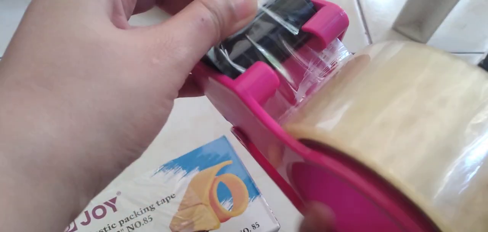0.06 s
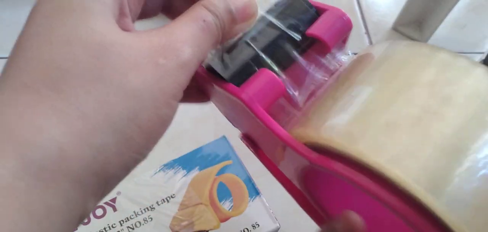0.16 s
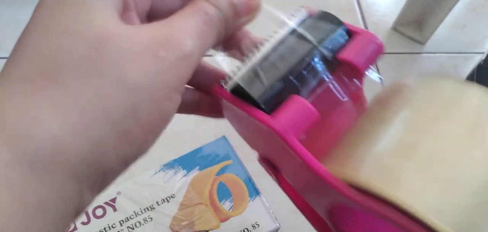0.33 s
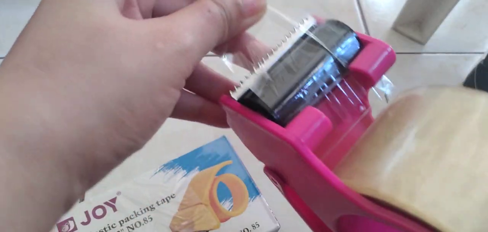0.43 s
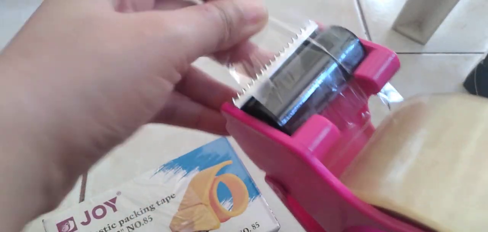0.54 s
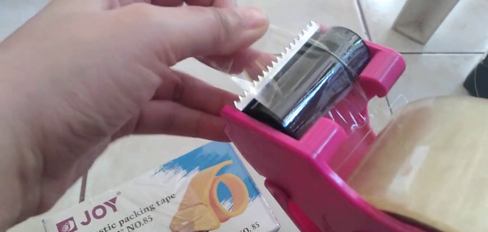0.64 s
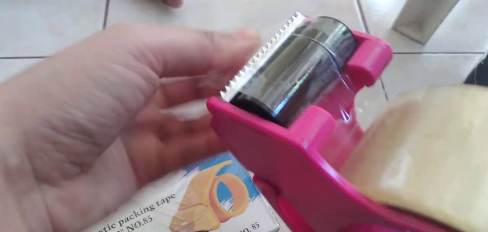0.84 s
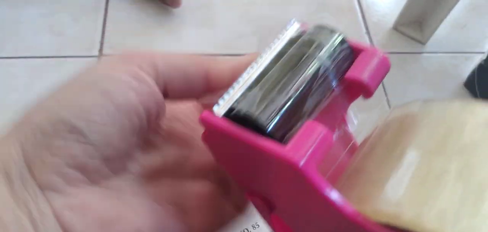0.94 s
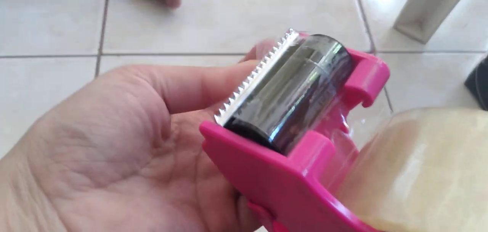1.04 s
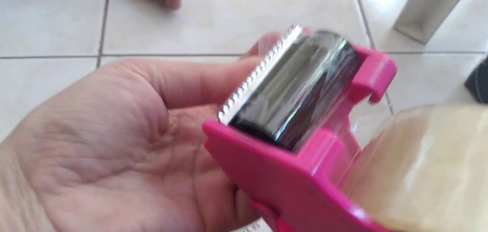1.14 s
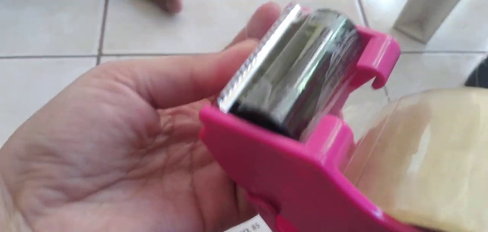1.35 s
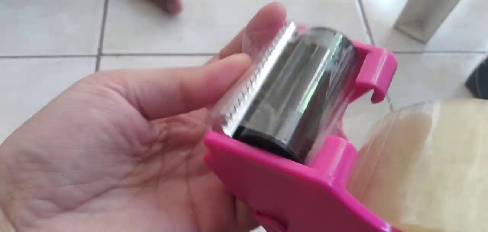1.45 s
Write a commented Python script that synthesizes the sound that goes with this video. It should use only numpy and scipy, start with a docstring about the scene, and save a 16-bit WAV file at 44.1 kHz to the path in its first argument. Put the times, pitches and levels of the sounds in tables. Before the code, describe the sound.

Packing tape ticks and snaps twice on a plastic dispenser, then crackles softly.

```python
"""Packing tape in a tiled room

A plastic dispenser is handled close to two microphones. The taut tape ticks, then snaps twice at the
blade, hard enough to overload them. Afterwards the sticky film peels and crackles under the fingers in
short strokes, now and then with a thin stick-slip squeak. A low hum lies underneath."""
import sys
import numpy as np
from scipy import signal
from scipy.fft import rfft, irfft, next_fast_len
from scipy.io import wavfile
from scipy.ndimage import uniform_filter1d

SR = 44100
rng = np.random.default_rng(int(sys.argv[2]) if len(sys.argv) > 2 else 0)


def wav_out(sig):
    """Save sig, one row per channel (or a flat mono array), as 16-bit PCM at SR to the path in sys.argv[1]."""
    wavfile.write(sys.argv[1], SR, np.round(np.clip(np.atleast_2d(sig).T, -1, 1) * 32767).astype(np.int16))


N = 66150


def amp(db):
    """Amplitude ratio of a level in decibels."""
    return 10 ** (np.asarray(db) / 20)


def unit(x):
    """Normalisation to an rms of 1."""
    return x / np.sqrt(np.mean(x ** 2) + 1e-20)


def along(points, hz):
    """Interpolation of (frequency [Hz], value) points on a logarithmic frequency axis."""
    frequencies, values = np.transpose(points)
    return np.interp(np.log(hz + 1), np.log(frequencies + 1), values)


def since(onset):
    """Time elapsed since an onset in seconds, zero before it."""
    return np.maximum(np.arange(N) / SR - onset, 0)


def pan(db):
    """Left and right gains for a level difference, right over left."""
    return amp(np.array([[-db], [db]]) / 2)


def coloured(x, points, tilt=0):
    """Minimum-phase filter through (frequency [Hz], gain [dB]) points, tilted in dB/octave about 8 kHz."""
    size = 2 * next_fast_len(N)
    hz = np.fft.rfftfreq(size, 1 / SR)
    octaves = np.log2(np.maximum(hz, 500) / 8000)
    cepstrum = irfft(np.log(amp(along(points, hz) + tilt * octaves)), size)
    cepstrum[1:size // 2] *= 2  # folding the cepstrum makes the filter causal
    cepstrum[size // 2 + 1:] = 0
    return irfft(rfft(x, size) * np.exp(rfft(cepstrum)), size)[..., :N]


def noise():
    """Two uncorrelated white noises."""
    return rng.standard_normal((2, N))


def ring(modes, t):
    """Free vibration: damped modes reach each microphone in a different phase."""
    return (t > 0) * sum(amp(db - 60 * t / t60) * np.sin(2 * np.pi * (hz * t + rng.random((2, 1))))
                         for hz, db, t60 in modes)


def glide(onset, length, hz, slope, waver):
    """Frequency modulation: a tone wavers at random about a linear glide as it swells and fades."""
    jitter = unit(uniform_filter1d(rng.standard_normal(N), size=60))
    pitch = (hz + slope * since(onset)) * (1 + waver * jitter)
    swell = np.sin(np.pi * np.minimum(since(onset) / length, 1))
    return swell * np.sin(2 * np.pi * np.cumsum(pitch) / SR)


def room(x):
    """Reverberation: dense early reflections from the floor, then the exponential tail of the tiled room."""
    # (frequency [Hz], reverberation time T60 [s])
    decay_times = [(100, .3), (800, 0.8), (3000, 0.57), (7000, 0.57), (11000, 0.52), (16000, 0.13)]
    early_db, early_t60 = 12.5, 0.22
    hz, t, spectra = signal.stft(rng.standard_normal((2, SR * 3 // 4)), SR, nperseg=256)
    fade = amp(-60 * t / along(decay_times, hz)[:, None]) + amp(early_db - 60 * t / early_t60)
    response = signal.istft(spectra * fade, SR, nperseg=256)[1]
    response = np.pad(response / np.linalg.norm(response[0]), ((0, 0), (100, 0)))  # 2.3 ms late
    return signal.fftconvolve(x, response, axes=1)[:, :N]


def background():
    """Superposition: the room's quiet air, a low hum of wavering level and faint far-off tones."""
    # spectrum of the air: (frequency [Hz], gain [dB])
    air_spectrum = [(25, -0.5), (60, -2.5), (110, -4.5), (240, -6), (400, -17.5), (750, -16.5), (1100, -24),
                    (3000, -29.5), (8000, -24.5), (15000, -38.5)]
    # envelope of the hum's fundamental: (time [s], level [dB])
    hum_envelope = [(0, -44.5), (.17, -44.5), (.22, -52), (.66, -52.5), (.8, -43), (.98, -55.5),
                    (1.12, -47), (1.3, -52), (1.5, -57)]
    # steady overtones of the hum: (frequency [Hz], level [dB])
    overtones = [(116, -67), (175, -62)]
    # far-off tones: (time [s], duration [s], frequency [Hz], glide [Hz/s], level [dB])
    far_tones = [(0.088, .11, 700, -350, -58.5), (0.541, 0.36, 807, -130, -59.5),
                 (1.078, 0.3, 737, 184, -63.5), (1.18, 0.1, 637, -4.5, -56)]
    air_db, side_db, hum_hz = -54.5, -6, 55
    t = since(0)
    mid, side = unit(coloured(noise(), air_spectrum)) * amp([[0], [side_db]])
    partials = [(hum_hz, np.interp(t, *np.transpose(hum_envelope)))] + overtones
    hum = sum(amp(db) * np.sqrt(2) * np.sin(2 * np.pi * (hz * t + rng.random())) for hz, db in partials)
    far = sum(amp(db) * glide(onset, length, hz, slope, waver=0.035)
              for onset, length, hz, slope, db in far_tones)
    return amp(air_db) * np.array([mid + side, mid - side]) + hum + far


def ticks():
    """Broadband transients: tape and plastic click as the tape tightens and the grip shifts."""
    # clicks: (time [s], level [dB], right over left [dB], tilt [dB/octave])
    clicks = [(.0085, -38, -1.5, -4), (.025, -40, 2.5, -4), (0.0354, -40.5, -0.5, -4),
              (0.066, -47.5, -2.5, 10.5), (0.1002, -39.5, 3, -1), (0.1094, -40.5, -2.5, -1),
              (.118, -38, 8, -3), (.1215, -37, -14, -3), (.133, -42, 5.5, -5), (0.1479, -34, -0.5, -2.5),
              (0.1836, -35.5, -2.5, -0.5), (0.195, -37, 1.5, -1), (0.2038, -28.5, 5, -2.5),
              (0.2145, -21.5, -7.5, 1), (.2218, -22.5, 1, -5.5), (0.9409, -33, 2.5, 1),
              (1.209, -41, -0.5, -0.5)]
    # spectrum of a click: (frequency [Hz], gain [dB])
    spectrum = [(150, -21.5), (500, -21), (1300, -8), (3000, -6), (7000, 1), (11000, -0.5), (15500, 3.5)]
    t60, room_db = 0.017, -8
    out = np.zeros((2, N))
    for onset, db, side_db, tilt in clicks:
        t = since(onset)
        burst = noise() * (t > 0) * amp(-60 * t / t60)
        out += amp(db) * pan(side_db) * coloured(burst, spectrum, tilt)
    return out + amp(room_db) * room(out)


def snaps():
    """Impulse excitation: each short crack sets the modes of blade and frame ringing, with a low thud."""
    # snaps: (time [s], material, level [dB], right over left [dB], frame knock [dB],
    #         thud level [dB], thud frequency [Hz], room gain [dB])
    impacts = [(0.2241, "tape", 1.5, -2, -28, -7, 272, -11),
               (0.3866, "plastic", -5, -2, -9.5, -11.5, 174, -10),
               (0.392, "plastic", 1.5, 12.5, -7, -1, 127, -9)]
    # spectra of the tape's crack and the plastic's clack, by material: (frequency [Hz], gain [dB])
    spectra = { "tape": [(100, -12), (400, 1), (700, 0), (1000, 5.5), (1250, 0.5), (1650, -17), (2300, -2),
               (2650, -4.5), (3400, 7.5), (4200, -2.5), (5000, 4.5), (5800, 4), (7000, -1), (11000, 1),
               (15500, -0.5)], "plastic": [(100, 1.5), (400, -10.5), (620, -5), (860, 3), (1200, 1),
               (1450, -8), (2150, 5), (2650, -9.5), (3200, 4), (3900, -8), (4700, 2.5), (5800, -2),
               (7000, 2), (11000, -6), (15500, -3)]}
    # modes of the blade: (frequency [Hz], level [dB], T60 [s])
    blade_modes = [(3573, -12.5, 0.021), (4400, -18, 0.035), (5020, -14.5, .03), (6363, -9, 0.02),
                   (7350, -7, 0.026), (10950, -10, 0.012)]
    # modes of the frame: (frequency [Hz], level [dB], T60 [s])
    frame_modes = [(888.4, -1, 0.041), (2110, -9.5, 0.006), (3188, -1, 0.031)]
    # radiation into the room: (frequency [Hz], gain [dB])
    radiation = [(100, -20.5), (350, -6), (800, -5), (1500, -5.5), (3000, -1), (8000, -1.5), (15000, 0)]
    hold_s, crack_t60 = 0.0023, 0.015
    thud_cycles, thud_side_db = 3, 19.5  # the thud falls 60 dB in these cycles
    out = np.zeros((2, N))
    for onset, material, db, side_db, knock_db, thud_db, thud_hz, room_db in impacts:
        t = since(onset)
        envelope = (t > 0) * amp(-60 * since(onset + hold_s) / crack_t60)
        crack = unit(coloured(noise(), spectra[material])) * envelope
        hit = amp(db) * (crack + ring(blade_modes, t)) + amp(knock_db) * ring(frame_modes, t)
        thud = amp(thud_db - 60 * t * thud_hz / thud_cycles) * np.sin(2 * np.pi * thud_hz * t)
        reverberation = amp(room_db) * room(coloured(hit, radiation))
        out += pan(side_db) * hit + pan(thud_side_db) * thud + reverberation
    return out


def overload_swings():
    """Overload recovery: pushed off centre, the microphones overshoot and settle like a high-pass filter."""
    # overloads: (time [s], level [dB])
    overloads = [(0.225, -6), (0.3948, 5)]
    rise_s, fall_s, return_s, left_db = 0.0025, 0.029, 0.064, -12
    leak = np.exp(-1 / (SR * return_s))
    out = np.zeros(N)
    for onset, db in overloads:
        t = since(onset)
        push = (1 - np.exp(-t / rise_s)) * np.exp(-t / fall_s)
        out += amp(db) * signal.lfilter([1, -1], [1, -leak], push)
    return out * amp([[left_db], [0]])


def rub():
    """Sliding friction: skin shifts over the plastic frame with a brief swell of dull noise."""
    # spectrum of the friction: (frequency [Hz], gain [dB])
    spectrum = [(60, 0), (200, 0), (500, -10), (900, -22), (2000, -11), (8000, -47)]
    onset_s, length_s, level_db = 0.4756, 0.071, -44.5
    swell = np.sin(np.pi * np.minimum(since(onset_s) / length_s, 1))
    return amp(level_db) * swell * unit(coloured(rng.standard_normal(N), spectrum))


def peels():
    """Shot noise: during each stroke the adhesive lets go in a swarm of tiny random slips."""
    # strokes: (time [s], duration [s], level [dB], right over left [dB], tilt [dB/octave], room gain [dB])
    strokes = [(0.534, 0.039, -44, -3, -5, 4), (0.613, 0.043, -38.5, -0.5, -2, 3.5),
               (0.651, 0.022, -41, -2, -1.5, 3.5), (0.68, 0.019, -36, 2.5, -0.5, -4.5),
               (0.704, 0.039, -45.5, 2, -2.5, 2.5), (0.774, 0.043, -58, 0, -3, 11.5),
               (0.836, 0.027, -41, 0, -0.5, 0), (0.989, 0.016, -41, -6.5, 3, 4),
               (1.045, 0.023, -35.5, -3, 4, 1), (1.08, 0.016, -52.5, -1, -3.5, 4.5),
               (1.4304, 0.013, -30.5, -2.5, 2, 0)]
    # response of the film: (frequency [Hz], gain [dB])
    film_response = [(150, -32.5), (700, -11), (1700, -10), (2200, -6.5), (2480, 0), (2750, -3.5),
                     (3150, -1), (3650, -5), (4150, 3), (4600, -1), (5080, 2.5), (5600, -1), (7500, 6),
                     (9200, 0), (11000, -4.5), (12500, -0.5), (15500, -7)]
    slips_per_s, spread_db = 5000, 2.5
    attack_share, release_s = 0.1, 0.0073
    out = np.zeros((2, N))
    for onset, length, db, side_db, tilt, room_db in strokes:
        slipping = rng.random(N) < slips_per_s / SR
        slips = unit(slipping * amp(spread_db * rng.standard_normal(N)) * noise())
        attack = 1 - np.exp(-since(onset) / (attack_share * length))
        release = np.exp(-since(onset + length) / release_s)
        film = coloured(slips * attack * release, film_response, tilt)
        out += amp(db) * pan(side_db) * (film + amp(room_db) * room(film))
    return out


def squeaks():
    """Stick-slip oscillation: slips of the film on the roller fall into step as a thin wavering tone."""
    # squeaks: (time [s], duration [s], frequency [Hz], level [dB])
    tones = [(0.602, 0.15, 11020, -50), (0.833, 0.033, 10650, -48), (0.855, 0.039, 10960, -45)]
    side_db, room_db = 10, -7
    direct = pan(side_db) * sum(amp(db) * glide(onset, length, hz, slope=0, waver=0.017)
                                for onset, length, hz, db in tones)
    return direct + amp(room_db) * room(direct)


def scene():
    """Linear superposition of all sources at the two microphones."""
    return background() + ticks() + snaps() + overload_swings() + rub() + peels() + squeaks()


def record(dry):
    """Transduction: each microphone port resonates, the signal clips at full scale and is band-limited."""
    # resonance of the left port: (frequency [Hz], gain [dB])
    left_port = [(3000, -1.5), (5800, -0.5), (6700, 2), (7450, 5.5), (8600, 1.5), (9800, -1.5),
                 (11000, -5.5), (14000, -10.5), (15800, -21)]
    # resonance of the right port: (frequency [Hz], gain [dB])
    right_port = [(3000, -0.5), (5800, -5), (7500, -6), (9000, 0.5), (10200, 9), (11100, 12), (12200, 7),
                  (13500, -2.5), (15800, 1)]
    cutoff_hz, edge_hz = 15850, 60
    ports = np.array([coloured(dry[0], left_port), coloured(dry[1], right_port)])
    clipped = np.clip(ports, -1, 1)
    size = 2 * next_fast_len(N)
    hz = np.fft.rfftfreq(size, 1 / SR)
    low_pass = 0.5 - 0.5 * np.tanh((hz - cutoff_hz) / (2 * edge_hz))
    return irfft(rfft(clipped, size) * low_pass, size)[:, :N]


dry = scene()
out = record(dry)
wav_out(out)
```